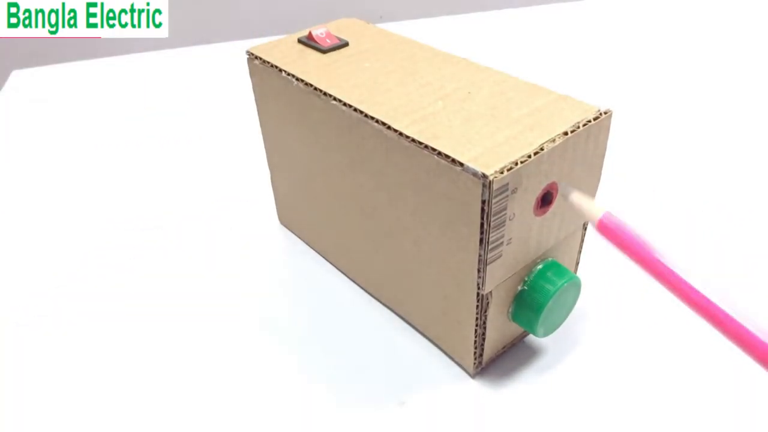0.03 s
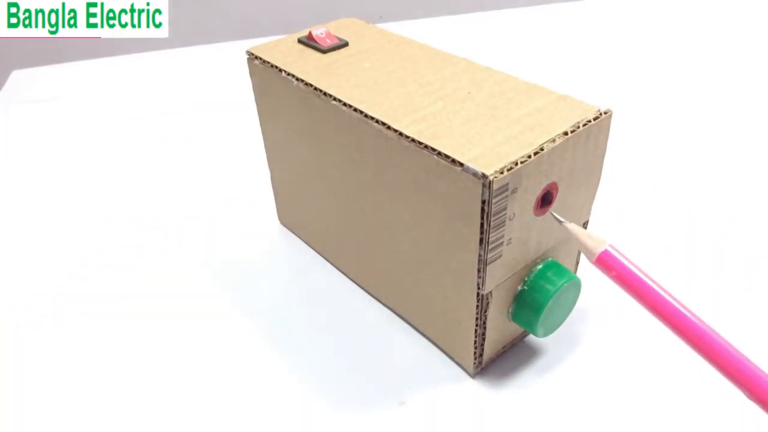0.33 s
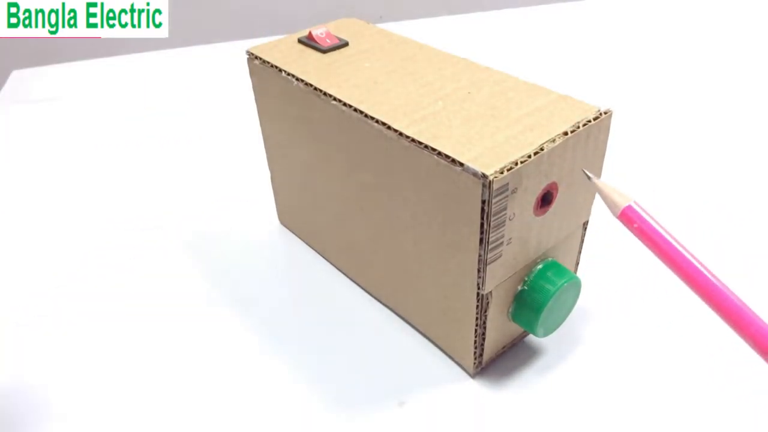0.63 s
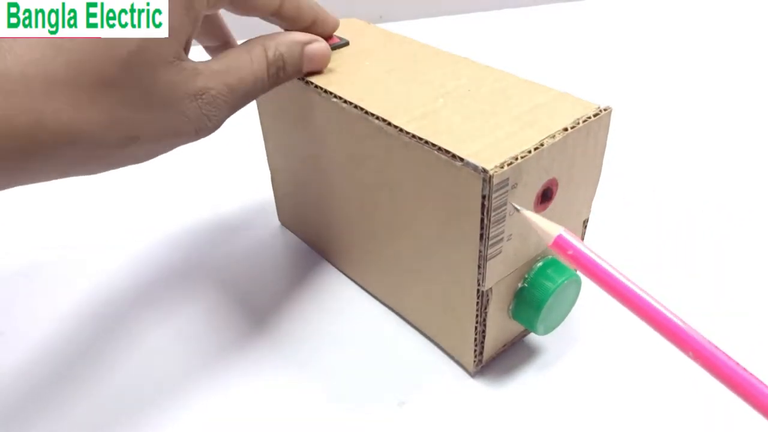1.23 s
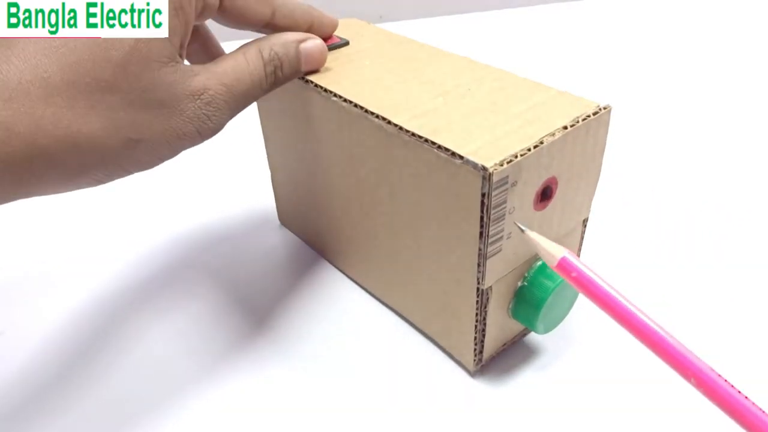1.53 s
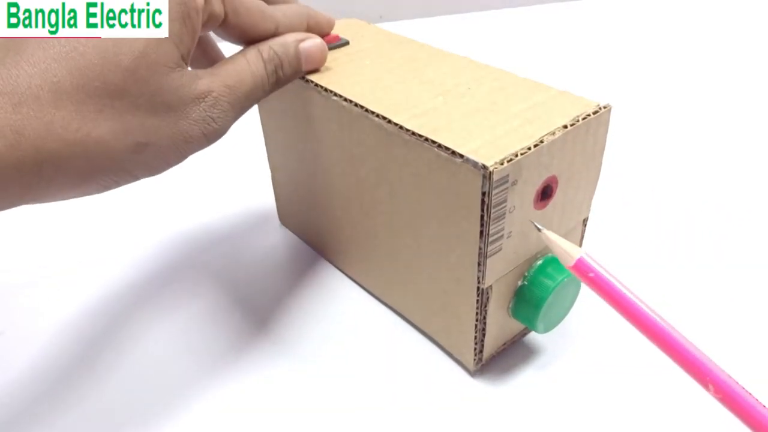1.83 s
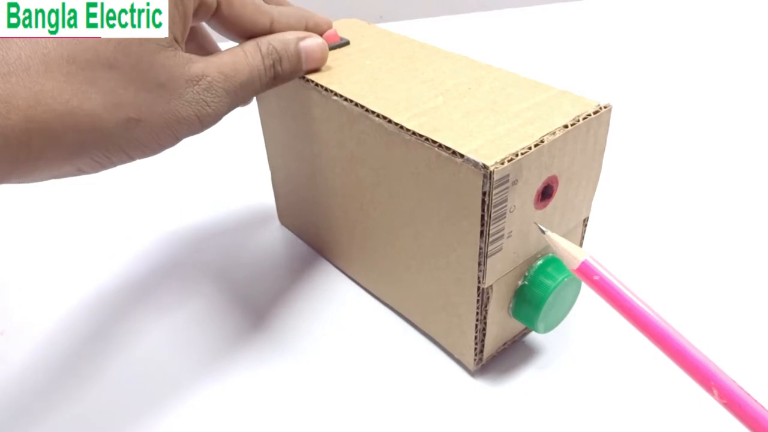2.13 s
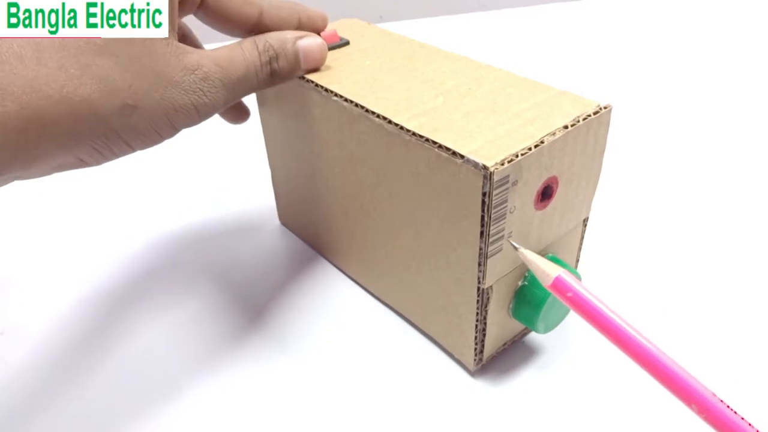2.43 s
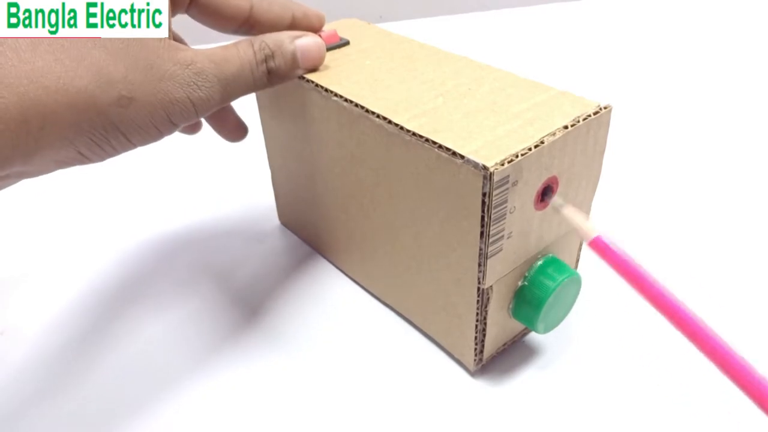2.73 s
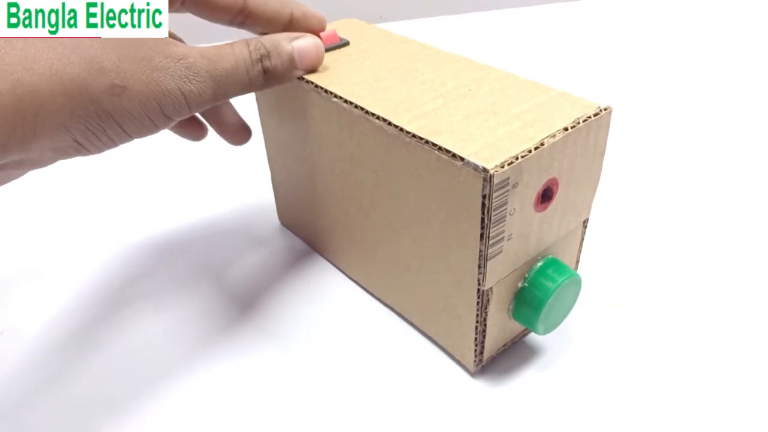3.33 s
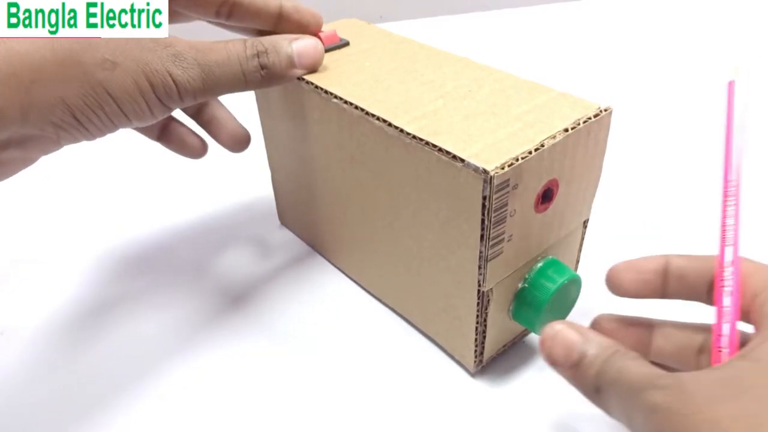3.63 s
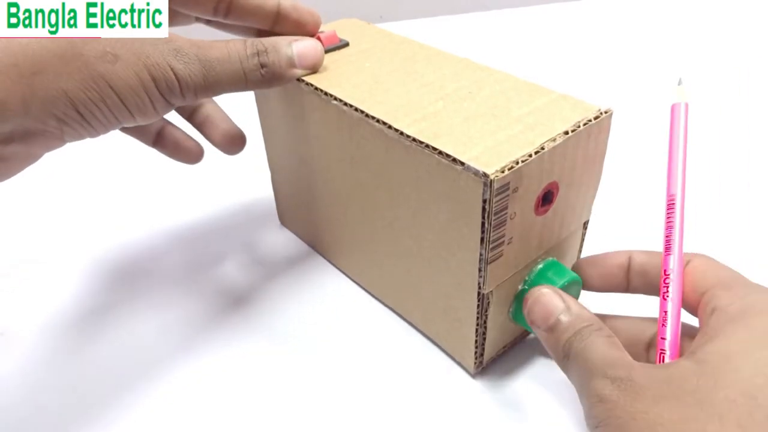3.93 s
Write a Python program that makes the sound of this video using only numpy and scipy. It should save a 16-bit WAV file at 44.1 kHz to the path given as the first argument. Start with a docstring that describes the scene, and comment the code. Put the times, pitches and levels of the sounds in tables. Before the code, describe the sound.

A small electric motor whirs and rattles in a cardboard box, clicks off and winds down.

```python
"""Small motor in a box, switched off.

A three-slot DC motor whines inside a cardboard box, close by in a quiet room. Its rotor knocks ring the
walls and the mount, a gear rasps and the brushes hiss. A rocker switch snaps off; friction stops the
rotor in about two thirds of a second, the whine sliding down, the rattle slowing and dulling.
A soft rub and three faint handling ticks follow over steady room noise."""
import sys
import numpy as np
from scipy import signal
from scipy.fft import rfft, irfft
from scipy.io import wavfile
from scipy.ndimage import uniform_filter1d

SR = 44100
rng = np.random.default_rng(int(sys.argv[2]) if len(sys.argv) > 2 else 0)


def persist_wave(psi):
    """Save psi, clipped to +-1, as 16-bit WAV."""
    counts = np.round(np.clip(psi, -1, 1) * 32767).astype(np.int16)
    wavfile.write(sys.argv[1], SR, np.atleast_2d(counts).T)


N = 176400
TIME_S, BIN_HZ = np.arange(N) / SR, np.fft.rfftfreq(N, 1 / SR)
OFF_S = 1.898
HAND_SETTLES_S = (0.58, 1.36)


def amp(db):
    """Decibels to gain."""
    return 10 ** (np.asarray(db) / 20)


def unit(x):
    """Scales to rms 1."""
    return x / np.sqrt(np.mean(x ** 2) + 1e-20)


def unit_powered(x):
    """Scales to rms 1 over the time the motor is powered."""
    return x / np.sqrt(np.mean(x[:round(OFF_S * SR)] ** 2) + 1e-20)


def at_hz(points, hz):
    """Interpolates (Hz, value) points on a log-frequency axis."""
    point_hz, value = np.transpose(points)
    return np.interp(np.log(hz + 1), np.log(point_hz + 1), value)


def envelope(points):
    """Interpolates (seconds, value) points at every sample."""
    return np.interp(TIME_S, *np.transpose(points))


def drift(hz):
    """Random motion of rms 1, mostly slower than hz."""
    return unit(irfft(rfft(rng.standard_normal(N)) / (1 + (BIN_HZ / hz) ** 2), N))


def colour(x, spectrum, size=4096):
    """Minimum-phase filter through (Hz, dB) points."""
    log_gain = np.log(amp(at_hz(spectrum, abs(np.fft.fftfreq(size, 1 / SR)))))
    taps = np.fft.ifft(np.exp(np.conj(signal.hilbert(log_gain)))).real
    return signal.oaconvolve(x, taps[:size // 2])[:N]


def resonate(x, hz, width_hz):
    """Steep resonance whose centre can move."""
    carrier = np.exp(2j * np.pi * np.cumsum(hz * np.ones(N)) / SR)
    pole = np.exp(-np.pi * width_hz / SR)
    baseband = signal.lfilter([(1 - pole) ** 2], [1, -2 * pole, pole * pole], x / carrier + 1e-18)
    return 2 * (carrier * baseband).real


def burst(start_s, decay_s, spectrum):
    """Decaying coloured noise of energy 1."""
    age_s = TIME_S - start_s
    crack = colour(rng.standard_normal(N) * (age_s >= 0) * np.exp(-abs(age_s) / decay_s), spectrum)
    return crack / np.linalg.norm(crack)


# Room decay. Each row: frequency in Hz, T60 in seconds.
ROOM_T60 = [(150, 0.42), (600, 0.81), (2500, 0.53), (8000, 0.25), (15000, 0.62)]
# Reverb width. Each row: frequency in Hz, side level in dB.
ROOM_SIDE = [(150, -12.5), (1200, -6.5), (2800, -14.5), (6000, -26), (12000, -61)]


def room(x, wet_db):
    """Direct sound plus a stereo tail that dies by band and narrows in the treble."""
    hz, age_s, bands = signal.stft(rng.standard_normal((2, SR)), SR, nperseg=256)
    bands[1] *= amp(at_hz(ROOM_SIDE, hz))[:, None]
    decay = amp(-60 * age_s / at_hz(ROOM_T60, hz)[:, None]) * (age_s > .004)
    tail = signal.istft(bands * decay, SR, nperseg=256)[1]
    mid, side = signal.fftconvolve(x[None], tail / np.linalg.norm(tail[0]), axes=1)[:, :N]
    return x + amp(wet_db) * (mid + np.array([side, -side]))


# Motor under power. Each row: time in seconds, whine pitch in Hz, whine level in dB.
POWERED_RUN = [(0.0, 675, -18.5), (0.03, 678.5, -15.5), (0.388, 683.1, -14.5), (1.116, 682, -14.5),
               (1.152, 683.7, -17), (1.51, 684.7, -14.5), (1.532, 688.4, -18), (1.642, 684, -12.5),
               (1.652, 686.8, -15.5), (1.89, 684.7, -13.5)]
SLOTS, FLUTTER_HZ = 3, 40.23


def shaft_speed(friction_hz_per_s=238, drag_per_s=1.15):
    """Turns per second: nearly steady under power, then braked by dry friction and drag."""
    powered_hz = envelope(np.array(POWERED_RUN)[:, :2]) / SLOTS
    coast_s = np.maximum(TIME_S - OFF_S, 0)
    brake_hz = friction_hz_per_s / drag_per_s
    shaft_hz = (powered_hz + brake_hz) * np.exp(-drag_per_s * coast_s) - brake_hz
    wobble = np.where(coast_s > 0, .008, .002) * drift(FLUTTER_HZ)
    return np.maximum(shaft_hz, 0) * (1 + wobble)


def shake(shaft_hz, knee_hz=56.2):
    """How hard the rotor shakes the box, 0 to 1; collapses below the knee."""
    push = (shaft_hz / knee_hz) ** 2.42
    return push / np.sqrt(1 + push ** 2)


def harmonic(turns, multiple, flutter_db=0.54):
    """One shaft harmonic with a slight level flutter."""
    tone = np.sqrt(2) * np.sin(2 * np.pi * (multiple * turns + rng.random()))
    return tone * amp(flutter_db * drift(FLUTTER_HZ))


# Powered harmonics. Each row: shaft multiple, level in dB relative to the whine.
POWERED_HARMONICS = [(1, -29.5), (2, -18), (3, -0.5), (4, -17.5), (5, -25.5), (6, -11), (7, -25.5),
                     (8, -24), (9, -29), (11, -26), (12, -22), (13, -27.5), (14, -48.5)]


def powered_whine(turns, pan_db=0.8):
    """Shaft harmonics led by the slot tone, cut with the power."""
    tones = sum(amp(db) * harmonic(turns, multiple) for multiple, db in POWERED_HARMONICS)
    level = amp(envelope(np.array(POWERED_RUN)[:, [0, 2]]))
    powered = uniform_filter1d(1. * (TIME_S < OFF_S), size=60)
    return tones * level * powered * amp([[-pan_db], [pan_db]])


def rotor_hits(shaft_hz, turns, pace, chatter_per_turn=11, spread_db=3.5, knock_db=-7, dull_hz=3000):
    """One knock per turn with loose chatter between; slower hits are duller."""
    whole_turns = np.maximum.accumulate(np.floor(turns + .09 * drift(hz=290.2)))
    knocks = np.diff(whole_turns, prepend=0) * (1 + 1.38 * rng.uniform(-1.11, 1, N))
    chatter = (rng.random(N) < chatter_per_turn * shaft_hz / SR) * rng.choice([-1, 1], N)
    chatter = chatter * amp(spread_db * np.clip(rng.standard_normal(N), -2, 2))
    # Slackens for a moment as the torque drops, then rattles a little harder.
    coast_db = (1.5 - 6 * np.exp(-abs(TIME_S - OFF_S) / .015)) * (TIME_S > OFF_S)
    hits = amp(knock_db) * unit_powered(knocks) + unit_powered(chatter)
    hits = hits * shake(shaft_hz) * amp(coast_db)
    lows = irfft(rfft(hits) / (1 + (BIN_HZ / dull_hz) ** 4), N)
    return lows + (hits - lows) * pace ** 0.93


# Cardboard response. Each row: frequency in Hz, gain in dB standing free, gain in dB under a hand.
BOX_RESPONSE = [(60, -35, -34), (118, -26, -23.5), (184, -27, -27.5), (273, -17.5, -13.5), (370, -9.5, -8),
                (505, 1, 4), (600, 0, -1.5), (880, -3.5, -2.5), (1090, -9, -9.5), (1247, 1, -5.5),
                (1547, -15, -9), (1730, -14, -10), (2230, -4.5, -9), (2410, 0, -6.5), (2800, -9.5, -2.5),
                (3290, -4, -4), (3584, -11, -18.5), (4365, -16.5, -8), (4490, -12.5, -20),
                (5060, -15.5, -13.5), (5740, -18, -24), (5740, -20.5, -23.5), (7900, -27, -26.5),
                (8400, -23.5, -33.5), (9700, -33, -33.5), (10800, -34, -36), (13000, -38, -38),
                (15500, -40, -42)]


def box_rattle(hits, held, level_db=-19.5):
    """Hits ring the cardboard walls; a settling hand changes their response."""
    walls = np.array(BOX_RESPONSE)
    free, pressed = colour(hits, walls[:, :2]), colour(hits, walls[:, [0, 2]])
    return amp(level_db) * unit_powered((1 - held) * free + held * pressed)


# Mount resonance. Each row: time in seconds, centre in Hz.
MOUNT_CENTRE = [(0, 2470), (.35, 2525), (.85, 2675), (1.2, 2640), (1.5, 2870), (1.9, 3049), (2.5, 2920)]


def mount_buzz(hits, pace, level_db=-33.5, coast_db=6):
    """Hits ring the mount; the loose rotor buzzes harder once the drive is off."""
    drive = hits * pace * amp(coast_db * (TIME_S > OFF_S))
    return amp(level_db) * unit_powered(resonate(drive, envelope(MOUNT_CENTRE), width_hz=260))


def gear_rasp(turns, pace, held, ratio=13, teeth=36, level_db=-34, throb_db=5.5, held_db=2.5):
    """Teeth scrape in a resonance that swells and bends each wheel turn, louder under the hand."""
    angle = 2 * np.pi * turns / ratio
    scrape = rng.standard_normal(N) * (1 + 0.89 * np.cos(teeth * angle)) * pace ** 2
    swell_db = throb_db * np.sin(angle) + 2.5 * drift(hz=7) + held_db * held
    centre_hz = 5330 + 170 * np.cos(angle)
    return amp(level_db) * unit_powered(resonate(scrape * amp(swell_db), centre_hz, width_hz=790))


def brush_hiss(turns, pace, hiss_db=-47, ring_db=-59.5):
    """Brushes hiss on the commutator, swelling as each slot passes, with a thin ring on top."""
    friction = rng.standard_normal(N) * (1 + 0.37 * np.cos(2 * np.pi * SLOTS * turns)) * pace ** 1.58
    hiss = unit_powered(resonate(friction, hz=8360, width_hz=2800))
    ring = unit_powered(resonate(friction, hz=10950, width_hz=300))
    return amp(hiss_db) * hiss + amp(ring_db) * ring


# Room noise. Each row: frequency in Hz, relative density in dB.
NOISE_SPECTRUM = [(15, -49), (25, -19), (58, -12.5), (86, -18.5), (122, -2.5), (140, -10), (156, -9),
                  (289, -4.5), (378, -5), (410, -8.5), (509, -8), (631, -10.5), (997, -11.5), (1080, -14.5),
                  (2420, -23), (4750, -29.5), (15500, -47.5)]
# Its stereo image. Each row: frequency in Hz, left-right correlation from 0 to 1.
NOISE_CORRELATION = [(60, 0.96), (240, 0.84), (950, 0.4), (3770, 0.56), (15000, 1)]
# Room hums. Each row: frequency in Hz, level in dB.
ROOM_HUMS = [(55, -63), (172, -58.5), (291, -54), (974, -60), (1943, -68)]


def room_noise(noise_db=-44, waver_db=1.7, waver_hz=2.94):
    """Steady stereo noise with a few wavering hums."""
    left, independent = rfft(rng.standard_normal((2, N)))
    correlation = at_hz(NOISE_CORRELATION, BIN_HZ)
    right = correlation * left + np.sqrt(1 - correlation ** 2) * independent
    noise = irfft(np.array([left, right]) * amp(at_hz(NOISE_SPECTRUM, BIN_HZ)), N)
    hums = np.zeros(N)
    for hz, db in ROOM_HUMS:
        level = amp(db + waver_db * drift(hz=3))
        phase = 2 * np.pi * np.cumsum(hz + waver_hz * drift(hz=12.5)) / SR
        hums += level * np.sqrt(2) * np.sin(phase)
    return amp(noise_db) * unit(noise) + hums


# Switch snap and thumb thump spectra. Each row: frequency in Hz, relative level in dB.
SNAP_SPECTRUM = [(100, -14), (300, -14), (3000, -22), (4300, -6), (5300, 6), (6500, -11), (8000, -13),
                 (10500, -5.5), (13000, -18), (16000, -15)]
THUMP_SPECTRUM = [(20, 15), (110, 8), (180, 11), (400, -25), (2000, -60)]


def rocker_switch(snap_db=7.5, thump_db=-10, thump_s=.012):
    """The thumb's push thumps the box, then the rocker snaps over and rings the room."""
    snap = amp(snap_db) * burst(start_s=1.8997, decay_s=0.0012, spectrum=SNAP_SPECTRUM)
    return room(snap, wet_db=-2.5) + amp(thump_db) * burst(OFF_S - thump_s, thump_s, THUMP_SPECTRUM)


# Coasting harmonics. Each row: shaft multiple, full-speed drive in dB, dB gained per halving of speed.
COAST_HARMONICS = [(1, -23.5, -11), (2, -25, -11), (3, -16.5, -10), (4, -38, -5), (6, -26.5, 2.5),
                   (9, -34.5, 1.5), (12, -36, 5), (15, -37, 2.5)]
# Radiation from the walls. Each row: frequency in Hz, gain in dB.
WALL_RADIATION = [(100, -30), (185, -14), (235, -24), (280, -5.5), (370, -8), (480, -1.5), (610, -1),
                  (690, -0.5), (850, 0.5), (1050, -1.5), (1350, -7), (2500, -22)]


def coasting_whine(shaft_hz, turns, rise_s=.035):
    """Unpowered harmonics slide down through the walls' response; the upper ones take over."""
    halvings = np.log2(shaft_hz.max() / np.maximum(shaft_hz, 20))
    tones = np.zeros(N)
    for multiple, db, db_per_halving in COAST_HARMONICS:
        wall_db = at_hz(WALL_RADIATION, multiple * shaft_hz)
        tones += amp(db + db_per_halving * halvings + wall_db) * harmonic(turns, multiple)
    fade_in = np.clip((TIME_S - OFF_S) / rise_s, 0, 1)
    return room(tones * fade_in * shake(shaft_hz), wet_db=-12)


# Rub envelope. Each row: time in seconds, level in dB.
RUB_LEVEL = [(2.401, -77), (2.521, -55), (2.65, -52), (2.75, -58.5), (2.95, -75)]
# Rub resonances. Each row: centre in Hz, width in Hz, relative level in dB.
RUB_RESONANCES = [(1716, 520, 1), (2650, 306, -5)]


def settling_rub():
    """Soft friction in two resonances as the rotor settles."""
    friction = sum(amp(db) * unit(resonate(rng.standard_normal(N), hz, width_hz))
                   for hz, width_hz, db in RUB_RESONANCES)
    return friction * amp(envelope(RUB_LEVEL))


# Ticks. Each row: start in seconds, energy in dB, decay in seconds, centre in Hz.
HANDLING_TICKS = [(3.013, -30, .004, 8000), (3.389, -28, .005, 8000), (3.695, -22.5, .025, 2980)]


def handling_ticks(half_width_octaves=0.64):
    """Fingers and a pencil tick faintly, each a burst of band-limited noise."""
    hz = np.geomspace(100, 16000, 24)
    ticks = np.zeros(N)
    for start_s, db, decay_s, centre_hz in HANDLING_TICKS:
        band_db = -10 * np.log10(1 + (np.log2(hz / centre_hz) / half_width_octaves) ** 4)
        ticks += amp(db) * burst(start_s, decay_s, np.transpose([hz, band_db]))
    return room(ticks, wet_db=-1)


def scene():
    """One shaft drives the whine and the mechanical noise; switch, rub, ticks and room noise join."""
    shaft_hz = shaft_speed()
    turns = np.cumsum(shaft_hz) / SR
    pace = shaft_hz / shaft_hz.max()
    held = np.interp(TIME_S, HAND_SETTLES_S, [0, 1])
    whine = powered_whine(turns) + coasting_whine(shaft_hz, turns)
    hits = rotor_hits(shaft_hz, turns, pace)
    rattle = box_rattle(hits, held) + mount_buzz(hits, pace)
    mechanism = room(rattle + gear_rasp(turns, pace, held) + brush_hiss(turns, pace), wet_db=-7.5)
    return whine + mechanism + rocker_switch() + settling_rub() + handling_ticks() + room_noise()


def record(dry, cutoff_hz=15700):
    """Steep low-pass on the whole scene."""
    taps = signal.firwin(511, cutoff_hz, window=("kaiser", 9), fs=SR)
    return signal.oaconvolve(dry, taps[None], "same")


dry = scene()
out = record(dry)
persist_wave(out)
```